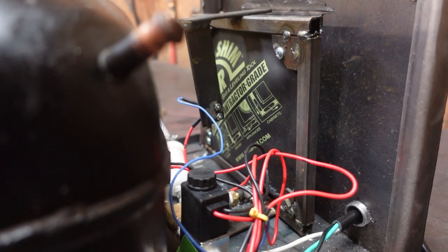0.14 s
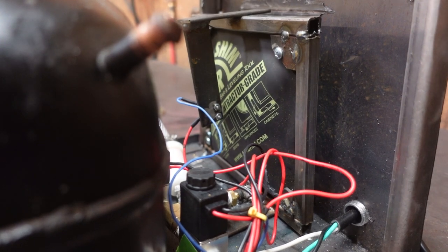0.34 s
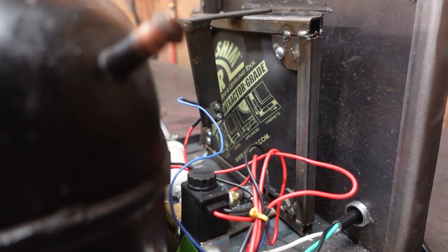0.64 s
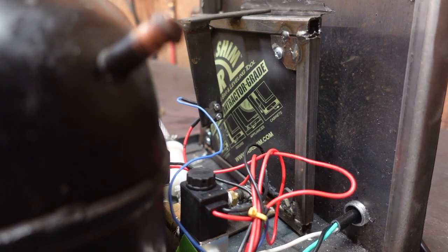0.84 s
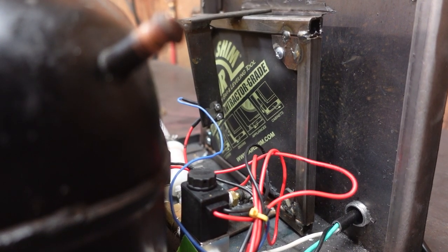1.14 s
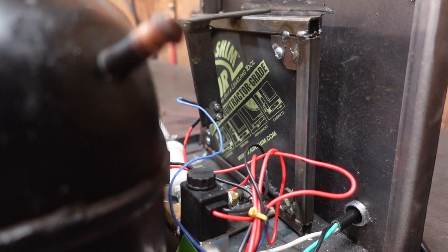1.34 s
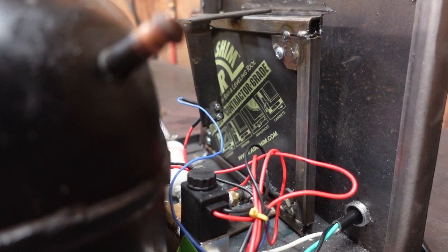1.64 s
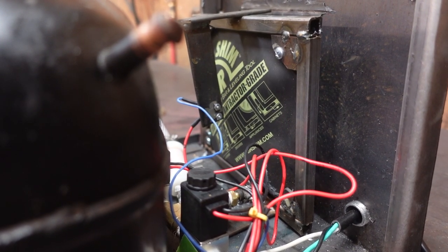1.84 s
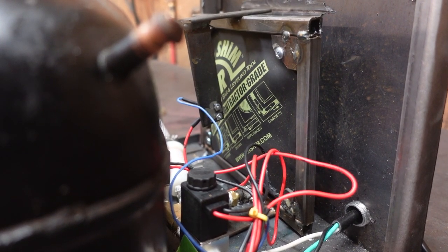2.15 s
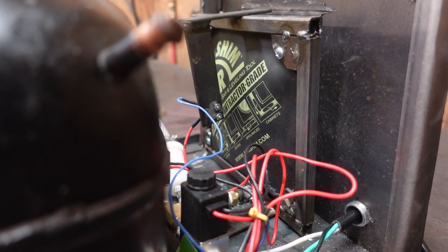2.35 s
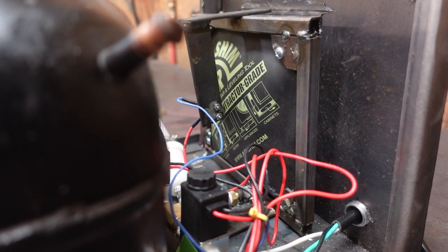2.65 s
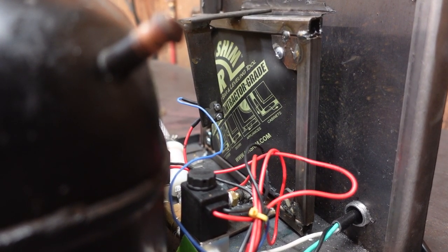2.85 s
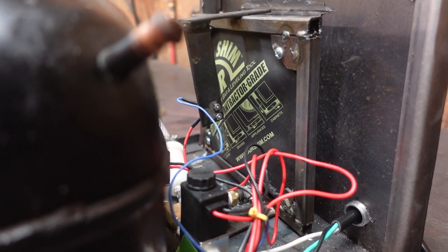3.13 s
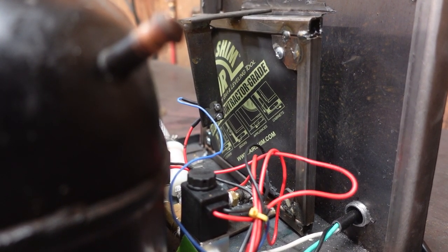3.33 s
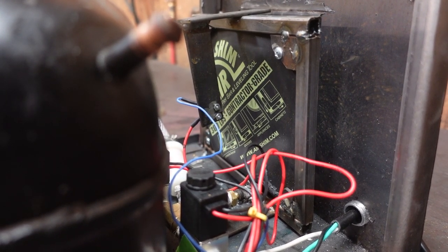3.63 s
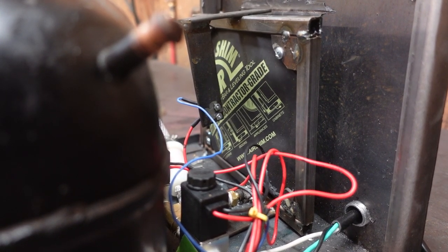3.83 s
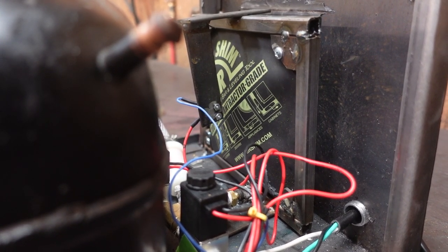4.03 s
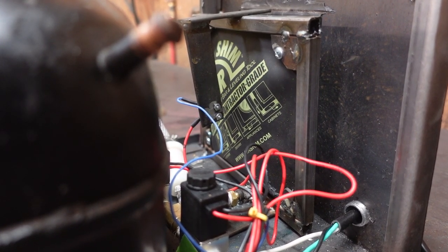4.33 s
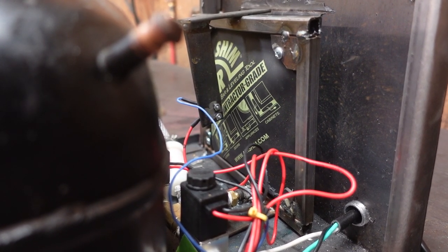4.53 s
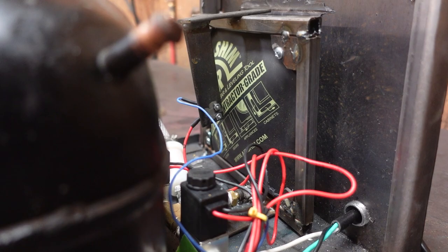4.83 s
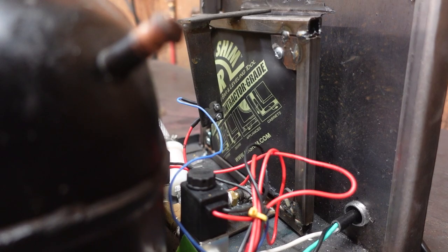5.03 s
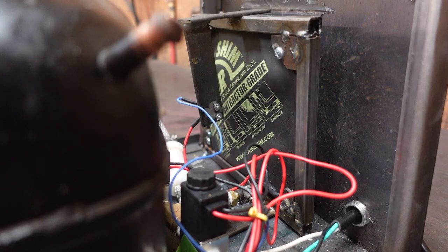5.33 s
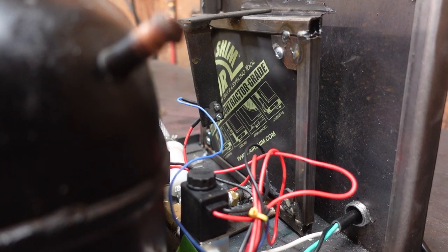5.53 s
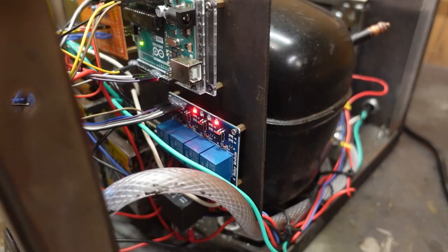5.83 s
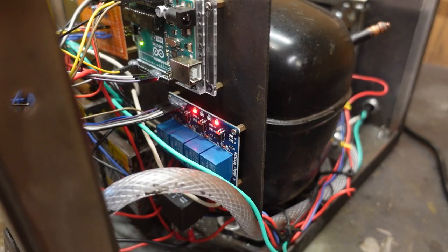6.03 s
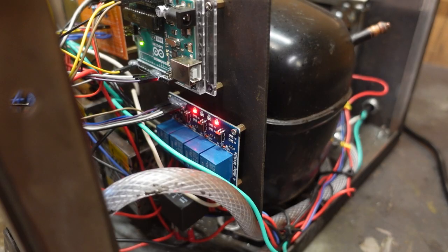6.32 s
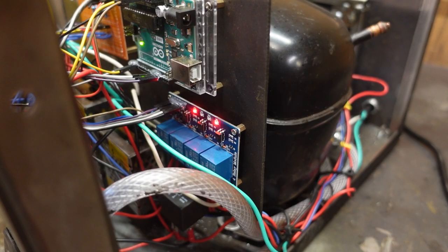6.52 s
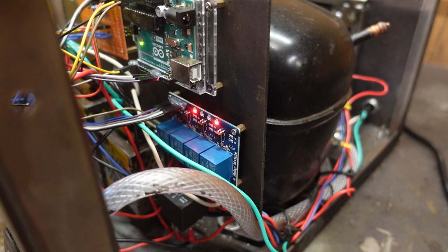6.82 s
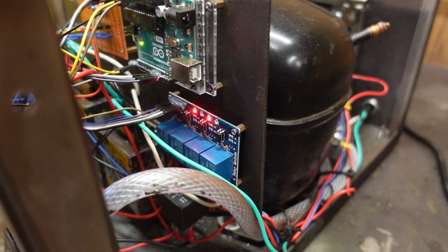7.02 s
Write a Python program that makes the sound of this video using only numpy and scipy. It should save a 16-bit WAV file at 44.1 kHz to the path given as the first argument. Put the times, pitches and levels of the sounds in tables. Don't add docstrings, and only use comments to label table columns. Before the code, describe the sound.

A small compressor hums low and hisses throughout, close to the microphone in a workshop. About every second a valve plunger rattles and hits its seat with a hard metallic crack. Openings come with paired relay ticks and a thin rush of air; closings release a short, hoarse vent blast that quickly dies. Dull, hollow pops sound in the hoses between. It ends just after the fourth opening.

```python
import sys
import numpy as np
from scipy import signal
from scipy.io import wavfile
from scipy.ndimage import uniform_filter1d, map_coordinates

SR = 44100
rng = np.random.default_rng(int(sys.argv[2]) if len(sys.argv) > 2 else 0)


def natural_amplitude(level_db):
    exponent = np.asarray(level_db, float) / 20
    return 10 ** exponent


def put_to_file(sound):
    columns = np.atleast_2d(sound).T
    safe = np.clip(columns, -1, 1)
    whole_steps = np.round(safe * 32767)
    wavfile.write(sys.argv[1], SR, whole_steps.astype(np.int16))


N = 316197


def rms_one(x):
    return x / np.sqrt(np.mean(x ** 2) + 1e-20)


def at_hz(points, hz, axis=1):
    points = np.array(points)
    octaves_outside = max(np.log2(points[0, 0] / hz), np.log2(hz / points[-1, 0]), 0)
    fall_db = 24 * octaves_outside if axis == 1 else 0
    return np.interp(np.log(hz), np.log(points[:, 0]), points[:, axis]) - fall_db


def with_pitch(hz_list, rows):
    return [(hz, *row) for hz, row in zip(hz_list, rows)]


def drift(rate):
    r = np.exp(-80 * np.pi * rate / SR)
    walk = signal.lfilter([1], [1, -2 * r, r * r], rng.standard_normal(N // 40 + 2002))
    return rms_one(walk[2000:])


def fine(slow, size=N):
    return np.interp(np.arange(size) / 40, np.arange(len(slow)), slow)


def clicks(times, sizes):
    out = np.full(N, 1e-18)
    np.add.at(out, (np.asarray(times) * SR).astype(int), sizes)
    return out


def ring(hz, t60, times, levels_db):
    r, w = natural_amplitude(-60 / (t60 * SR)), 2 * np.pi * hz / SR
    return signal.lfilter([0, np.sin(w)], [1, -2 * r * np.cos(w), r * r], clicks(times, natural_amplitude(levels_db)))


def bands():
    edges_hz = 22 * 2 ** np.arange(0, 9.7, 1 / 3)
    for k, (low, high) in enumerate(zip(edges_hz, edges_hz[1:])):
        yield k, np.sqrt(low * high), signal.butter(2, [low, high], "band", fs=SR, output="sos")


def coloured(spectrum, patchy_db):
    white, together, out = rng.standard_normal((2, N)), drift(0.99), np.zeros(N)
    for k, hz, sos in bands():
        if spectrum[0][0] / 1.5 < hz < spectrum[-1][0] * 1.5:
            level_db = at_hz(spectrum, hz) + patchy_db * (1.07 * together + drift(4.0))
            out += fine(natural_amplitude(level_db)) * signal.sosfilt(sos, white[k % 2])
    return rms_one(out)


def pipes(peaks, source, waver_db):
    out = np.zeros(len(source))
    for k, (hz, width, level_db) in enumerate(peaks):
        r = np.exp(-np.pi * width / SR)
        tone = signal.lfilter([1, 0, -1], [1, -2 * r * np.cos(2 * np.pi * hz / SR), r * r], source)
        gain = fine(natural_amplitude(level_db + waver_db * drift(2.54)), size=len(source))
        out += gain * np.sqrt(width) * rms_one(tone) * (-1) ** k
    return rms_one(out)


def fading(times, levels_db, t60, rise):
    fall, swell = natural_amplitude(-120 / (t60 * SR)), np.exp(-1 / (rise * SR))
    return signal.lfilter([1 - swell], [1, -fall - swell, fall * swell], clicks(times, natural_amplitude(2 * levels_db)))


def bursts(times, levels_db, tilt, colour, rise):
    white, out = rng.standard_normal((2, N)), np.zeros(N)
    for k, hz, sos in bands():
        if hz > 90 and colour[0][0] / 2 < hz < colour[-1][0] * 2:
            band_db = levels_db + tilt * np.log2(hz / 4000) + at_hz(colour, hz)
            power = fading(times, band_db, at_hz(colour, hz, axis=2), rise)
            out += signal.sosfilt(sos, np.sqrt(power * SR / hz / 4) * white[k % 2])
    return out


def pulse(s, level_db, hz, shape, cycles, rise=1e-3):
    steady = np.arange(-200, 200) / SR * hz
    turns = np.expm1(rise * steady) / rise
    bell = np.exp(-(steady / cycles / np.where(steady < 0, 1 - rise / 2, 1 + rise)) ** 2)
    wave = np.cos(2 * np.pi * turns + np.pi / 2 * (1 - shape)) * bell * natural_amplitude(level_db)
    out, at = np.zeros(N + 400), int(s * SR)
    out[at:at + 400] = wave
    return out[200:N + 200]


SEAT_S = np.array([.5992, 1.6408, 2.7178, 3.7595, 4.883, 5.8796, 6.9493, 6.9562])
# [crack level/dB, crack tilt/(dB per octave), housing level/dB, housing tilt/(dB per octave)]
SEATS = [(0.5, 1.1, -15.5, 0.58), (-4, 8, -17, 0.096), (3.5, 1.5, -13.5, 0.5), (-2, 6, -14.5, 0.091),
         (5.5, 2, -10.5, .6), (-7.5, 4, -35, .1), (-4, 2.5, -30, .1), (2.5, -1.5, -14, 0.074)]
# [f/Hz, level/dB, t60/s]
SNAP = [(2000, -21, 0.0052), (4920, 0, 0.0018), (9000, -19, 0.0022), (13000, -13, .004),
        (16000, -18, 0.0037)]
# [f/Hz, level/dB, t60/s]
CRACK = [(600, -24.5, 0.053), (1960, -8.5, 0.072), (3980, -2.5, 0.04), (8000, -1, 0.024),
         (11400, 9, 0.0081), (14800, 6, 0.0043)]
# [f/Hz, level/dB, t60/s]
HOUSING = [(250, -24.5, 0.18), (624, 0.5, 0.21), (1500, -10, 0.62), (3000, 0.5, 0.21), (5960, -8, 0.44),
           (10100, -2, 0.18), (16000, -3, .1)]


def plunger_cracks():
    crack_db, tilt, housing_db, housing_tilt = np.transpose(SEATS)
    snap = bursts(SEAT_S, crack_db - 1.5, tilt, SNAP, rise=.00005)
    crack = bursts(SEAT_S, crack_db - 7.0, tilt, CRACK, rise=.0001)
    housing = bursts(SEAT_S, housing_db - 10.5, housing_tilt, HOUSING, rise=.001)
    return snap + crack + housing


DROPS = [1, 3, 5]
HOUSING_HZ = [562, 790, 1200, 1545, 2046, 2369, 3140, 4005, 4720, 5626, 5949, 7400, 8515, 8861]
# [level/dB, t60/s]
HOUSING_MODES = [(-4, 0.2), (-8, .1), (-4, 0.12), (8, 0.075), (-5.5, .13), (-1.5, 0.14), (10, 0.028),
                 (-11.5, .085), (-2, 0.11), (-2, 0.12), (-11, 0.18), (-14, 0.027), (-8, .04), (-12, .11)]
DROP_HZ = [2250, 3040, 3900, 5500, 6500, 7400, 8600, 12000]
# [level/dB, t60/s]
DROP_MODES = [(0, .04), (7.5, 0.032), (4, 0.023), (2, .025), (8, 0.029), (-9, 0.021), (13, .025), (3, .015)]


def housing_ring():
    housing_db, out = np.transpose(SEATS)[2], np.zeros(N)
    pulls = np.delete(np.arange(len(SEAT_S)), DROPS)
    pull_modes, drop_modes = with_pitch(HOUSING_HZ, HOUSING_MODES), with_pitch(DROP_HZ, DROP_MODES)
    for hits, modes, gain_db in [(pulls, pull_modes, -9.0), (DROPS, drop_modes, -6.0)]:
        spread_db = rng.normal(0, 0.73, (len(hits), len(modes)))
        for k, (hz, level_db, t60) in enumerate(modes):
            blow_db = housing_db[hits] + level_db + gain_db + spread_db[:, k]
            out += ring(hz, min(t60, .15), SEAT_S[hits], blow_db)
    return out


# [t/s, level/dB, tilt/(dB per octave)]
TRAVEL = [
    (0.593, -22, 3),
    (1.634, -27.5, 6),
    (2.711, -20, 3.5),
    (3.753, -25.5, 2),
    (4.876, -21, 4),
    (5.872, -14, 6),
    (6.9465, -25, 11.5),
]
# [f/Hz, level/dB, t60/s]
RATTLE = [(553, 20.5, 0.013), (2000, 4.5, 0.045), (4020, 1.5, 0.07), (7460, 7.5, 0.04), (16000, -5, 0.036)]


def plunger_rattle():
    s, level_db, tilt = np.transpose(TRAVEL)
    return bursts(s, level_db, tilt, RATTLE, rise=.0045)


# [t/s, peak level/dB, tilt/(dB per octave)]
TICKS = [
    (0.548, -26.5, -1.5),
    (0.6599, -28, -1),
    (2.699, -23, -2.5),
    (2.765, -24, -1.5),
    (4.84, -21.5, -1.5),
    (4.9424, -21, -2),
    (6.9133, -27.5, -2.5),
    (7.016, -26.5, -1.5),
    (6.866, -41, -3.5),
]
# [f/Hz, level/dB, t60/s]
TICK = [(296, -10.5, 0.057), (1500, -12.5, 0.088), (4000, -14, 0.044), (7990, -0.5, 0.033),
        (13000, 3, 0.015), (16000, -18, .012)]
# [f/Hz, level/dB, t60/s]
RELAY_MODES = [(5500, -7, 0.04), (5270, -8, .03), (7200, -6, 0.028)]


def relay_ticks():
    tick_s, tick_db, tilt = np.transpose(TICKS)
    out = bursts(tick_s, tick_db - 2.5, tilt, TICK, rise=.0002)
    for hz, level_db, t60 in RELAY_MODES:
        out += ring(hz, t60, tick_s[1::2], tick_db[1::2] + level_db)
    return out


# [t/s, level/dB, tilt/(dB per octave), deep thump level/dB, share by which tones start low]
VENTS = [
    (1.6405, -20.5, 0.6, -15.5, 0.22),
    (3.76, -18.5, 0, -14.5, 0.065),
    (5.88, -20.5, -0.5, -19.5, 0.0497),
]
# [f/Hz, level/dB, t60/s]
BLAST = [(151, -10.5, 0.14), (383, -3, 0.92), (760, 13.5, 0.11), (1300, -11.5, 0.98), (2160, 1, 0.65),
         (3020, 3, 0.41), (5000, 2, 0.7), (6700, -1, 0.2), (8800, -0.5, 0.36), (16000, -9.5, 0.3)]
# [f/Hz, width/Hz, level/dB]
BLAST_PIPES = [
    [(425, 70, 4), (650, 67, 2), (1220, 110, 6.5), (1520, 150, 7.5), (2410, 51, -1), (2620, 73, 2.5),
     (3240, 160, 2.5), (3580, 66, -3), (4220, 59, -3), (4930, 160, -7), (5340, 60, -8), (6920, 100, 1)],
    [(454, 73, 1.5), (690, 180, -4), (1266, 150, 5), (1530, 157, 5), (2490, 150, -1), (3246, 140, 1),
     (3690, 40, -2), (4240, 150, -7), (4670, 68, -10), (5140, 40, 0), (5900, 40, -2), (6840, 96, 0)],
    [(450, 100, 0), (844, 65, -1.5), (1250, 64, 6.5), (1600, 44, -4), (1840, 40, -7), (2260, 46, -3.5),
     (2930, 130, -3.5), (3530, 130, -13), (4170, 95, -15), (5440, 60, -10), (6580, 130, -7), (6940, 60, -4)],
]
# [all/(dB per s), treble extra/(dB per s)]
VENT_FADES = [
    (80, 69.5),
    (68, 60),
    (79, 70),
]


def vent_tones():
    out, t = np.zeros(N), np.arange(SR) / SR
    low_pass = signal.butter(4, 3700, fs=SR, output="sos")
    high_pass = signal.butter(4, 3700, "high", fs=SR, output="sos")
    for (s, blast_db, tilt, deep_db, slide), peaks, (fade, dulling) in zip(VENTS, BLAST_PIPES, VENT_FADES):
        tones = pipes(peaks, rng.standard_normal(SR), waver_db=-0.3)
        played = np.cumsum(1 - slide * np.exp(-t / .045))
        low = signal.sosfilt(low_pass, map_coordinates(tones, [played], order=3))
        high = natural_amplitude(-dulling * t) * signal.sosfilt(high_pass, tones)
        swell = np.minimum(t / .014, 1)
        start = int(s * SR)
        out[start:start + SR] += natural_amplitude(blast_db - 1.0 - fade * t) * swell * (low + high)
        out -= pulse(s + 0.0014, blast_db + 16.0, 345, 0.18, cycles=0.48)
        out -= pulse(s + 0.0014, deep_db, 56, 0.24, cycles=0.17)
    return out


def vent_blasts():
    s, blast_db, tilt = np.transpose(VENTS)[:3]
    return bursts(s, blast_db - 7.0, tilt, BLAST, rise=.003) + vent_tones()


# [t/s, peak level/dB]
POPS = [
    [(.5487, -34.5), (4.8413, -26.5), (6.9145, -37)],
    [(.7946, -29.5), (2.8986, -27.5), (5.0763, -25.5), (7.151, -31)],
    [(1.2251, -13), (3.3281, -10), (5.5083, -8)],
    [(1.5541, -21.5), (3.6565, -19.5), (5.8359, -18)],
    [(.002, -15.5), (2.1497, -13), (4.2876, -10)],
    [(6.3616, -11.5)],
]
# [f/Hz, shape (0 swing - 1 bump), echo level/dB and spit level/dB against the pop, pitch rise/cycle]
POP_KINDS = [
    (478, 0.4, -13, -33, .1),
    (610, 0.37, -27, -20, .1),
    (458.5, 0.97, -19.5, -24, 0.034),
    (490, 0.23, -19, -35, 0.32),
    (456, 0.25, -16.5, -40, 0.48),
    (410, 0.11, -14, -40, 0.36),
]
# [f/Hz, level/dB, t60/s]
PUFF = [(123.3, -35, 0.06), (344, -2.5, 0.61), (452, 0, 0.078), (700, -3, 0.087), (1010, -5, 0.046),
        (2020, -36, 0.087)]
# [f/Hz, level/dB, t60/s]
SPIT = [(1000, 5, .1), (2500, -6, .1), (4500, -3, 0.11), (7000, -29, 0.09)]
# [delay t/s, level/dB]
POP_ECHOES = [
    (.0108, -9),
    (.0192, -12),
    (.031, -18),
]


def hose_pops():
    rows = []
    for (hz, shape, echo, spit, rise), events in zip(POP_KINDS, POPS):
        rows += [(s, db, hz, shape, db + echo, db + spit, rise) for s, db in events]
    pop_s, pop_db, pop_hz, shape, echo_db, spit_db, rise = np.transpose(rows)
    out = bursts(pop_s + 0.00075, echo_db, 0, PUFF, rise=.002)
    out += bursts(pop_s + 0.0012, spit_db, 0, SPIT, rise=.0015)
    out += ring(322, .14, pop_s + 0.002, echo_db + 3.0 - 8 * shape)
    for s, db, hz, bump, up in zip(pop_s, pop_db, pop_hz, shape, rise):
        out += pulse(s, db + 2.0, hz, bump, cycles=0.51 + 0.17 * bump, rise=up)
        out += pulse(s, db - 5.5 - 24 * bump, 0.21 * hz, bump, cycles=0.24)
        for delay, loss_db in POP_ECHOES:
            if s + delay < N / SR:
                out -= pulse(s + delay, db + loss_db - 9.0 * (1 - bump), hz, bump, cycles=0.54)
    return out


# [opens t/s, shuts t/s, first level/dB, midway level/dB, last level/dB]
OPEN = [
    (0.603, 1.642, -50, -53, -49.5),
    (2.71, 3.765, -47.5, -49, -48.5),
    (4.876, 5.87, -42, -46.5, -47),
    (6.949, 7.17, -28, -46.5, -47.5),
]
# [f/Hz, level/(dB per Hz)]
FLOW = [(180, 1.5), (300, 11.5), (873, 5), (1100, 10), (1370, -8), (1650, -55), (1850, -8), (2720, 0.5),
        (2950, -4), (4060, -4.5), (4270, -6.5), (12800, -9.5), (16200, -39)]
PIPE_HZ = [855, 1860, 2290, 2540, 3000, 3280, 3560, 3970, 4500, 4890, 5455, 5960, 6175, 6850, 7345, 8540,
           8855, 9155, 9530, 9820, 10950, 12600]
# [width/Hz, level/dB]
FLOW_PIPES = [(39, -8), (75, -4), (140, -12), (95, -25), (90, -3), (31.9, 3), (30, -0.5), (45, 0),
              (190, -18), (49, -11.5), (119.8, -14.5), (59, -14.5), (24, -11), (100, -29.5), (55, -22),
              (40, -13), (60, -20), (45, -18), (45, -14.5), (48, -20), (400, -27), (84, -21)]
# [width/Hz, level/dB]
FULL_PIPES = [(60, -1), (41, -9), (38.5, -3), (95, -4.5), (80, -18), (60, -1), (27, 3.5), (45, 5),
              (250, -14.5), (37, -3), (160, -13), (43, -7), (30, -6), (76, -8.5), (46, -14), (40, -5.5),
              (40, -12), (40, -12), (40, -6.5), (53, -15), (200, -13), (73, -19)]


def flow():
    t, gain, full = np.arange(N) / SR, np.zeros(N), np.zeros(N)
    for opens, shuts, *levels_db in OPEN:
        inside = (t > opens) * (t < shuts)
        gain += inside * natural_amplitude(np.interp(t, [opens, (opens + shuts) / 2, shuts], levels_db))
        full += inside * np.clip((t - opens - .35) / 0.35, 0, 1)
    air = rng.standard_normal(N)
    early = pipes(with_pitch(PIPE_HZ, FLOW_PIPES), air, waver_db=1.6)
    late = pipes(with_pitch(PIPE_HZ, FULL_PIPES), air, waver_db=1.6)
    tones = natural_amplitude(5.5) * (1 - full) * early + natural_amplitude(3.0) * full * late
    return uniform_filter1d(gain, size=400) * (coloured(FLOW, patchy_db=-0.5) + tones)


# [t/s, level/dB]
BACKGROUND_LEVEL = [(0, -2.5), (1.2, -1), (2.0, -1), (2.45, 0), (2.9, 0), (3.4, 2), (4.1, 3.5), (4.7, 4), (5.2, 3.5),
                    (5.7, 3), (6.3, 0.5), (7.17, 0)]


def background_level():
    s, level_db = np.transpose(BACKGROUND_LEVEL)
    return np.interp(np.arange(N) / SR, s, level_db)


# [t/s, peak level/dB, sag/(dB per s)]
OPENINGS = [
    (.6, -43, 18),
    (2.72, -41.5, 17),
    (4.878, -37, 18),
    (6.95, -40, 15),
]
# [t/s, peak level/dB, sag/(dB per s)]
CLOSINGS = [
    (-.5, -45, 6.9),
    (1.64, -38.5, 15),
    (3.76, -39, 8.2),
    (5.88, -45, 7.6),
]
# (start Hz, rest Hz, glide s, creep Hz per s)
OPEN_GLIDE, SHUT_GLIDE = (1540, 1290, 0.28, 30), (1200, 1390, .15, 60)
INTAKE_DELAY_S, INTAKE_RISE_DB_PER_S, OVERSHOOT_DB, OVERSHOOT_S = 0.15, 127, -1, 0.068
SURGE_DB, SURGE_S = 5.5, 0.074


def intake():
    t, hz, level_db, surge_db = np.arange(N) / SR, np.zeros(N), np.zeros(N), np.zeros(N)
    switches = sorted([(*row, OPEN_GLIDE, 0) for row in OPENINGS] + [(*row, SHUT_GLIDE, 1) for row in CLOSINGS])
    for s, peak_db, sag, (start_hz, rest_hz, glide, creep), vents in switches:
        after = t >= s
        since = t[after] - s
        late = since - INTAKE_DELAY_S
        hz[after] = rest_hz + (start_hz - rest_hz) * np.exp(-since / glide) + creep * since
        rising_db = INTAKE_RISE_DB_PER_S * late + OVERSHOOT_DB
        sagging_db = OVERSHOOT_DB * np.exp(-late / OVERSHOOT_S) - sag * late
        level_db[after] = peak_db + np.where(late < 0, rising_db, sagging_db)
        surge_db[after] = vents * SURGE_DB * since / SURGE_S * np.exp(1 - since / SURGE_S)
    return hz, level_db, surge_db


def reed_chatter():
    turn = round(SR / 59.6)
    stroke = 1 + .75 * np.cos(2 * np.pi * np.arange(turn) / turn)
    fresh = rng.standard_normal((N // turn + 61, turn)) * stroke
    turns = signal.lfilter([1], [1, -.98], fresh, axis=0)
    return rms_one(turns[60:].ravel()[:N])


# [f/Hz, level/(dB per Hz)]
PUMP = [(150, 2), (250, -7), (600, -9), (1100, -6), (1400, -19), (1700, -18.5), (2400, -18), (3600, -22),
        (5000, -23), (6500, -26), (8500, -30.5), (11000, -33), (14000, -39), (16200, -37.5)]
PUMP_HZ = [598, 1420, 1880, 3020, 3260, 3940]
# [width/Hz, level/dB]
PUMP_PIPES = [(37, 0.5), (240, -7.5), (40, -2.5), (50, -1.5), (35, 5), (41, -13)]
SHELL_HZ = [4890, 5180, 5520, 5980, 6610, 6730, 7090, 7330, 7860, 8470, 9050, 9180, 9590, 10200, 10400,
            10600, 11300, 11700, 12100, 12300, 12800, 13400, 13800, 15200]
# [width/Hz, level/dB]
SHELL = [(150, 4.5), (18, 0), (60, 4.5), (80, -12), (45, 5), (19, 2.5), (20, 2), (45, 2.5), (70, -4),
         (25, -10), (18, -4), (22, -4), (60, 4), (60, -4), (60, -16), (35.1, -11), (60, -14), (25, 3),
         (45, 1.5), (45, -13), (60, -16), (25, -10), (55, -11), (70, -1)]


def pump():
    intake_hz, intake_db, surge_db = intake()
    hiss_db = -45.5 + background_level() + surge_db
    slow = signal.sosfilt(signal.butter(2, 55, fs=SR, output="sos"), rng.standard_normal((2, N)))
    phase = 2 * np.pi * np.cumsum(intake_hz) / SR
    sliding = rms_one(slow[0] * np.cos(phase) + slow[1] * np.sin(phase))
    reeds = reed_chatter()
    tones = pipes(with_pitch(PUMP_HZ, PUMP_PIPES), rng.standard_normal(N) + .5 * reeds, waver_db=3.0)
    tones = signal.sosfilt(signal.butter(4, 4800, fs=SR, output="sos"), tones)
    hiss = coloured(PUMP, patchy_db=1.0) + natural_amplitude(-6.5) * tones
    shell = natural_amplitude(-60.5) * pipes(with_pitch(SHELL_HZ, SHELL), reeds, waver_db=1.5)
    return natural_amplitude(hiss_db) * hiss + shell + natural_amplitude(intake_db - 2.0) * sliding


# [t/s, peak level/dB, hold t/s]
NUDGES = [
    (0.255, -27.5, 0.61),
    (2.448, -33, 0.38),
    (3.562, -36.5, 0.73),
    (4.614, -29.5, 0.32),
    (5.1, -35.5, 0.52),
    (5.777, -36.5, 0.09),
]
SWAY_REST_DB, SWAY_RISE_DB_PER_S, SWAY_FALL_DB_PER_S = -44, 200, 36


def frame_sway():
    t, level_db = np.arange(N) / SR, np.full(N, float(SWAY_REST_DB))
    for s, peak_db, hold in NUDGES:
        rise_db, fall_db = SWAY_RISE_DB_PER_S * (t - s), SWAY_FALL_DB_PER_S * (s + hold - t)
        level_db = np.maximum(level_db, peak_db + np.minimum(0, np.minimum(rise_db, fall_db)))
    sway = np.sin(2 * np.pi * 13.8 * t)
    rock = 0.22 * np.sin(2 * np.pi * 16.0 * t + 1.36)
    return np.sqrt(2) * natural_amplitude(level_db) * (sway + rock)


# [f/Hz, rms level/dB]
HUM = [
    (59.6, -45.5),
    (91.8, -47.5),
    (120, -49.5),
    (597, -59.5),
    (895, -59.5),
]
# [f/Hz, level/(dB per Hz)]
RUMBLE = [(16, -36), (26, 2), (45, 6), (70, -2.5), (110, 0), (170, -7.5), (260, -16.5), (400, -20)]


def motor():
    background_db, out = background_level(), np.zeros(N)
    for hz, level_db in HUM:
        phase = 2 * np.pi * np.cumsum(hz + fine(0.432 * drift(1.86))) / SR
        wavering = fine(natural_amplitude(level_db + 0.8 * drift(7.6)))
        out += np.sqrt(2) * wavering * natural_amplitude(0.99 * background_db) * np.sin(phase)
    rumble_db = -39 + 0.97 * background_db - 5.5
    return out + natural_amplitude(rumble_db) * coloured(RUMBLE, patchy_db=3.0)


def scene():
    valves = plunger_cracks() + housing_ring() + plunger_rattle() + relay_ticks() + vent_blasts() + hose_pops()
    return (valves + flow() + pump() + frame_sway() + motor())[None, :]


def band_limit(x):
    return signal.sosfilt(signal.butter(12, 16370, fs=SR, output="sos"), x)


def record(dry):
    r, w = np.exp(-np.pi * 260 / SR), 2 * np.pi * 1030 / SR
    peak = signal.lfilter([(1 - r * r) / 2, 0, (r * r - 1) / 2], [1, -2 * r * np.cos(w), r * r], dry)
    x = 0.99 * np.tanh((dry - 0.56 * peak) / 1.173)
    top_hz = 15710
    body = signal.sosfilt(signal.ellip(10, .3, 55, top_hz, fs=SR, output="sos"), x)
    top = signal.sosfilt(signal.butter(6, [top_hz, 16500], "band", fs=SR, output="sos"), x)
    loud = np.clip(uniform_filter1d(np.abs(x), size=300) / 0.18 - 1, 0, 1)
    return band_limit(body + loud * top)


dry = scene()
out = record(dry)
put_to_file(out)
```